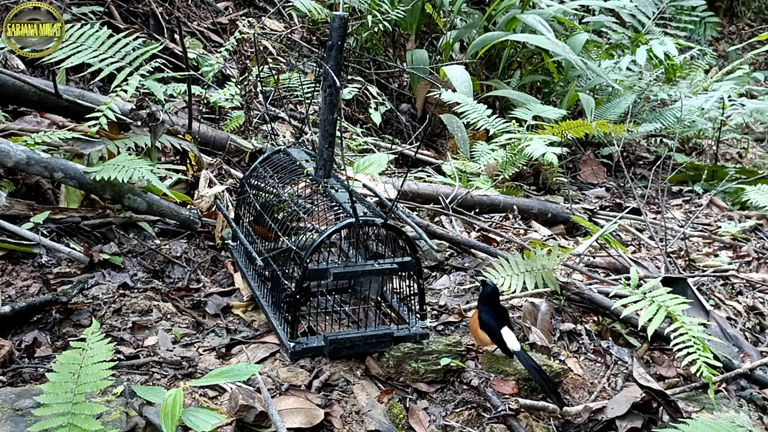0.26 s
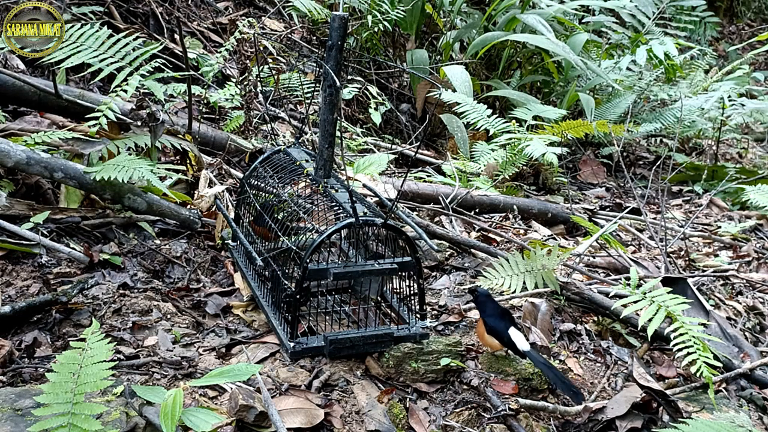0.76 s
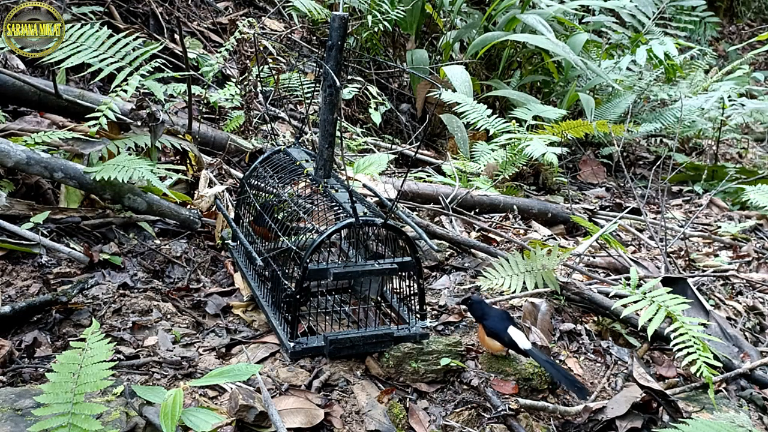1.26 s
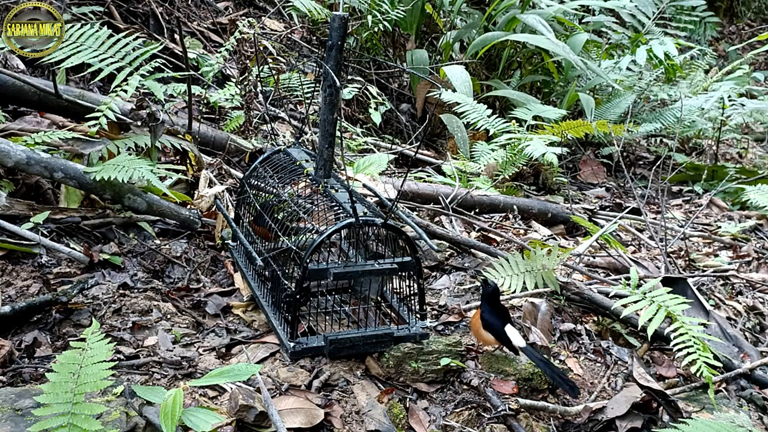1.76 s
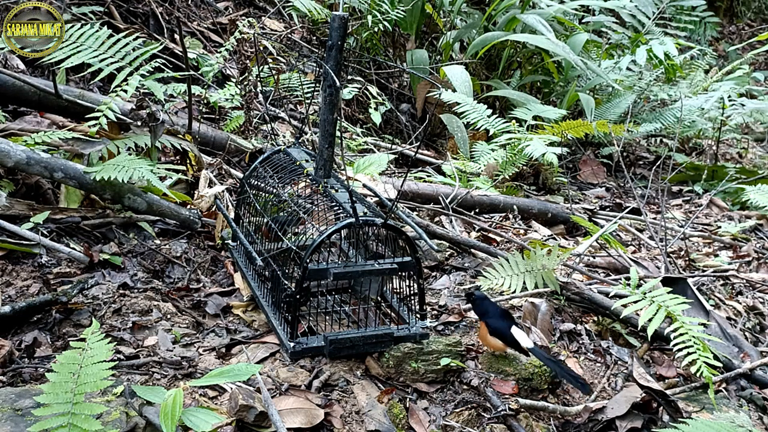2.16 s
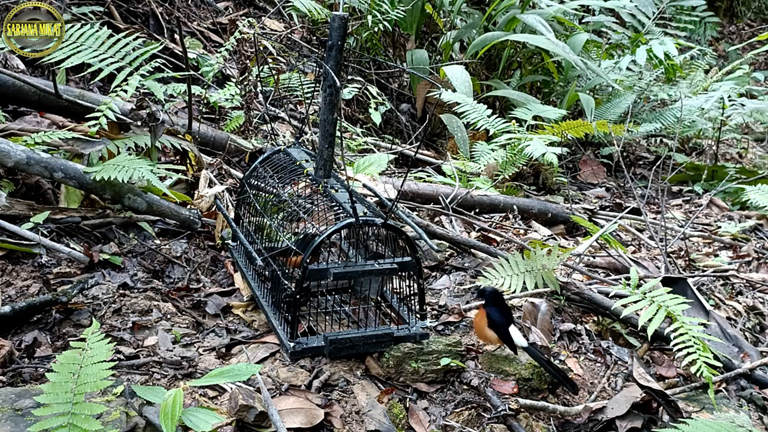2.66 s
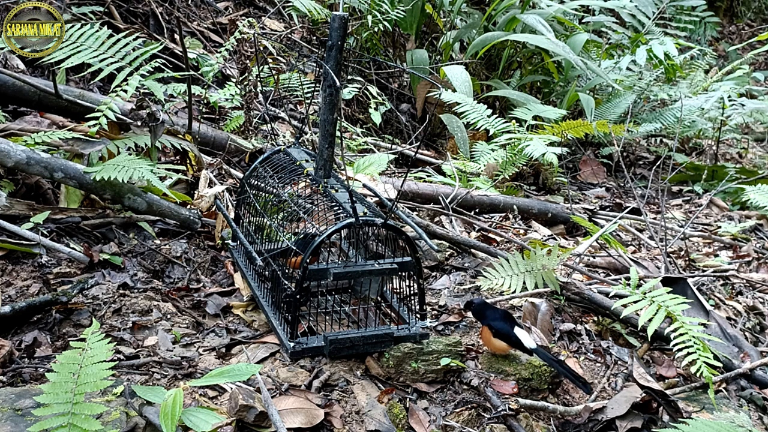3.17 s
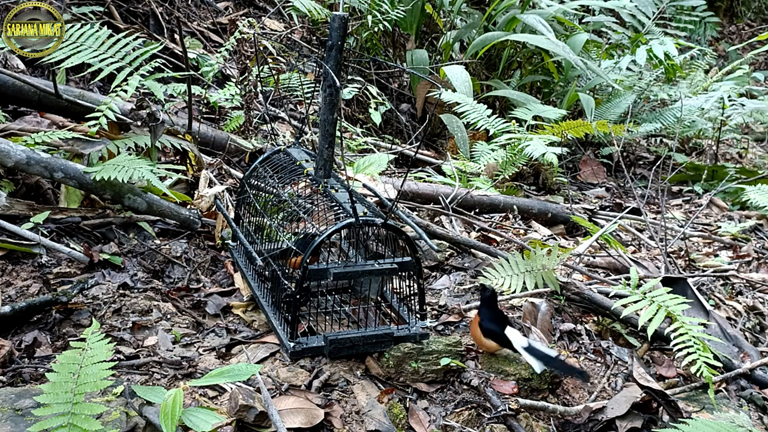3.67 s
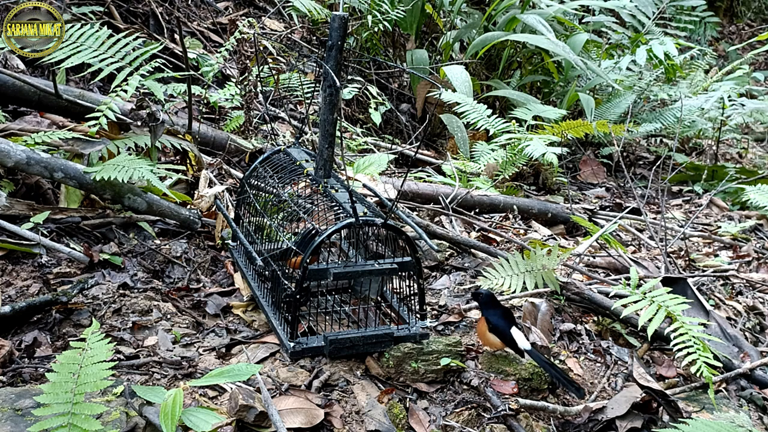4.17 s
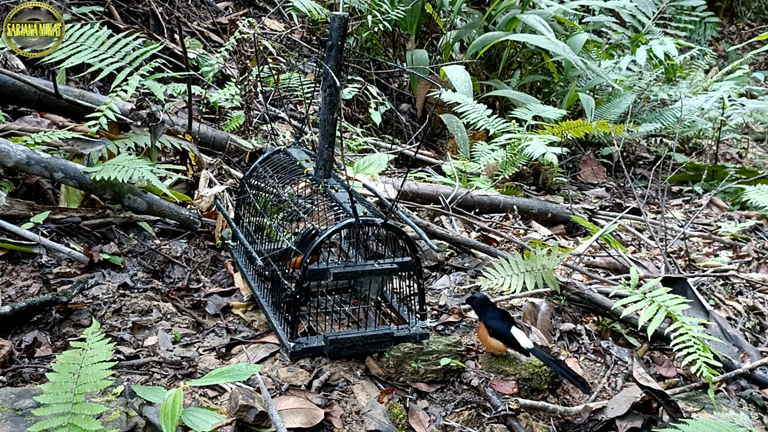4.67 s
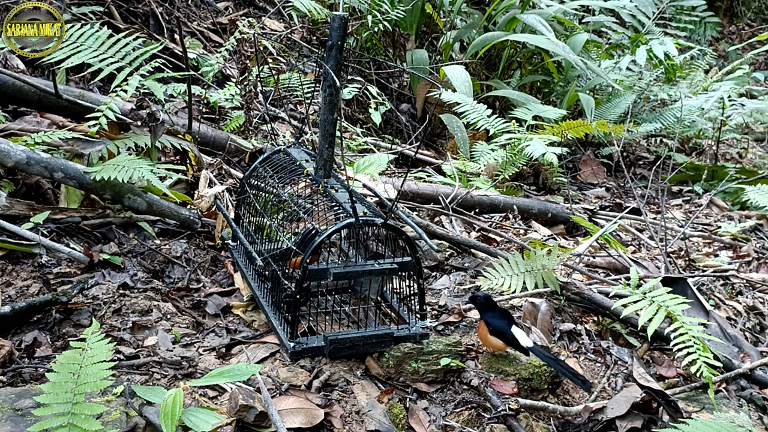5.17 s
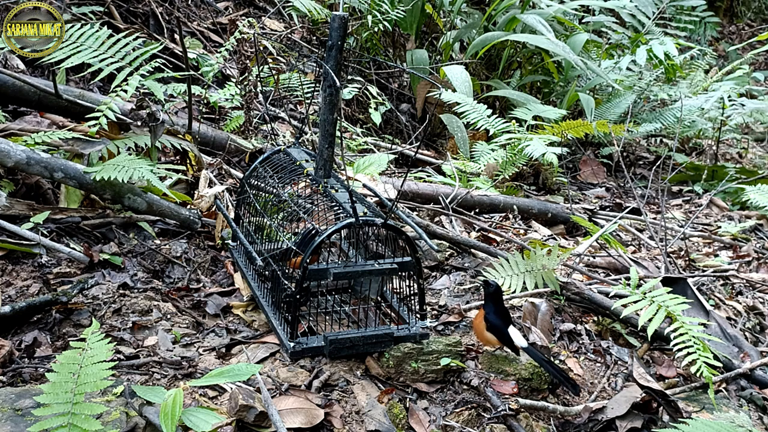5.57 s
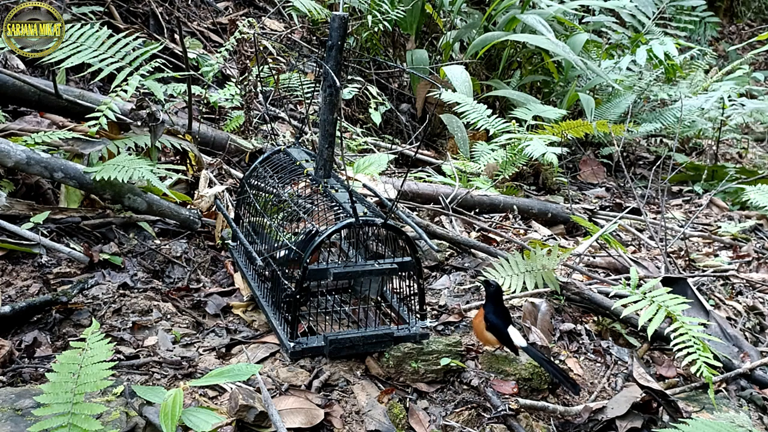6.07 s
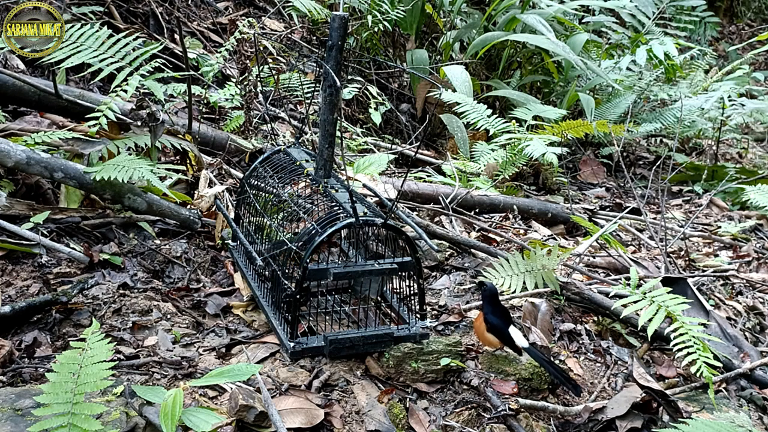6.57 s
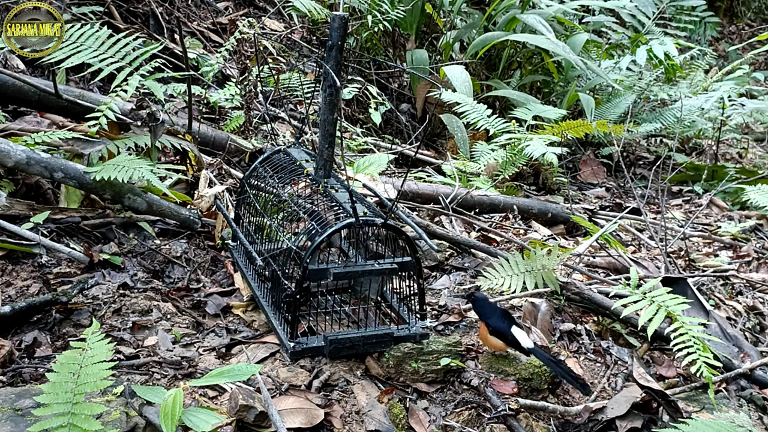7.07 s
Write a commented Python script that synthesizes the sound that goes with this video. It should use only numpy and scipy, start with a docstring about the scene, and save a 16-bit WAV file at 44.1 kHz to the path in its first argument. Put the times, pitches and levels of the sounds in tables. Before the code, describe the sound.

In a damp forest, a bird performs a varied song in broken phrases: quiet gliding whistles, two strong raspy rattle passages, quick upward chirps, swooping and warbled whistles, and tiny ticks between. The loudest strokes are close and slightly overloaded, with a faint pre-copy and a brief diffuse echo from trunks. A soft, high, gently throbbing cicada band and airy hush fill the stereo background.

```python
"""Forest floor: a songbird sings whistles, warbles, buzzy chirps and hard rattles over a cicada chorus.
Its whistles are gliding near sines; its rattles and ticks are very fast sweeps, with rasp and throat hiss.
Each bird sound arrives twice, a faint early copy and then the strong one, with echoes from the trunks.
Behind it, drifting noise makes the forest hush and throbbing noise bands make the cicadas.
The loudest peaks clip at full scale."""
import sys
import numpy as np
from scipy import signal
from scipy.fft import rfft, irfft, next_fast_len
from scipy.io import wavfile
from scipy.ndimage import uniform_filter1d

SR = 44100
rng = np.random.default_rng(int(sys.argv[2]) if len(sys.argv) > 2 else 0)


def bounce(signal):
    """Save signal as a 16-bit WAV file at the path given by the first command-line argument."""
    frames = np.transpose(np.atleast_2d(signal))
    limited = np.clip(frames, -1, 1)
    pcm = np.round(limited * 32767).astype(np.int16)
    wavfile.write(sys.argv[1], SR, pcm)


N = 322371
EDGE_HZ = 15600  # upper edge of the sound's band
FLICK_HALF = 400  # samples from the start of a flick to its peak


# Hiss of air through the throat, relative spectrum: pitch_hz, level_db
AIRFLOW_SPECTRUM = [(1500, -30), (2500, 0), (4000, -14), (9000, -6), (15000, -16)]


def bird():
    """The whole dry song, with breath noise that follows the whistled notes, low ones most."""
    song = whistled_song()
    low_weighted = uniform_filter1d(song, size=11)
    effort = np.sqrt(abs(uniform_filter1d(low_weighted ** 2, size=200)))
    hiss = amp(-32) * effort * coloured(AIRFLOW_SPECTRUM)
    return song + rattles() + rasp() + ticks() + hiss


# Freely shaped whistles, each a curve of points: time_s, pitch_hz, level_db
FREE_WHISTLES = [
    [(0.125, 1607, -44.5), (0.215, 1717, -35.5), (0.24, 1481, -23.5), (0.257, 1038, -28)],
    [(0.53, 616, -57), (0.575, 859, -43), (0.6, 1268, -39.5), (0.62, 1342, -41.5), (0.635, 1197, -73)],
    [(1.45, 1518, -48.5), (1.475, 1248, -41.5), (1.51, 1619, -34.5), (1.53, 1482, -26.5),
     (1.548, 1125, -45)],
    [(2.958, 2178, -33.5), (2.971, 2660, -15.5), (2.976, 3400, -38)],
    [(2.983, 2770, -23), (2.987, 2876, -10.5), (2.993, 3536, -29.5), (2.999, 4500, -22)],
    [(3.005, 4260, -29), (3.012, 4520, -35.5), (3.02, 4820, -26)],
    [(3.034, 5090, -35), (3.042, 5450, -39), (3.05, 5550, -17)],
    [(3.598, 1622, -22.5), (3.628, 1723, -34), (3.64, 2194, -40), (3.655, 2390, -27.5)],
    [(4.44, 989, -49), (4.449, 2080, -19), (4.458, 1757, -15)],
    [(4.466, 1536, -29.5), (4.481, 1340, -30)],
    [(4.5, 2314, -56.5), (4.575, 2470, -46.5), (4.605, 2310, -54.5), (4.615, 2427, -33.5),
     (4.632, 2944, -33.5)],
    [(4.6, 1475, -34), (4.62, 1218, -42.5), (4.645, 1897, -14), (4.665, 2120, -17.5)],
    [(4.704, 1734, -22), (4.711, 2458, 1.5), (4.716, 2890, -4.5), (4.724, 2453, -2.5), (4.76, 2195, -3.5),
     (4.793, 2084, -25)],
    [(4.983, 1872, -23.5), (4.988, 2732, -7), (4.992, 3030, -14.5), (5.0, 2710, -6.5), (5.01, 2495, -19.5),
     (5.016, 2150, -36)],
    [(5.68, 4086, -43), (5.69, 3330, -30), (5.693, 2627, -23), (5.696, 2440, -8.5), (5.701, 2340, -25)],
    [(5.712, 4355, -28.5), (5.72, 2692, -9.5), (5.727, 2094, -15.5), (5.736, 2690, -12),
     (5.745, 2890, -17.5)],
    [(7.14, 730, -34), (7.165, 1273, -24), (7.19, 1562, -29), (7.2, 1290, -26.5), (7.212, 1548, -21.5),
     (7.232, 1200, -36)],
]


def whistled_song():
    """Everything sung as a near sine: free whistles, ruled shapes and buzzy chirps."""
    song = np.zeros(N)
    curves = FREE_WHISTLES + simple_notes() + plunges() + held_notes() + warbles() + rattle_closers()
    for rows in curves:
        add(song, *whistle(rows))
    for rows in buzzy_chirps():
        add(song, *whistle(rows, buzzy=True))
    return song


# Simple notes, loudest where the pitch turns:
# start_s, turn_s, end_s, start_hz, turn_hz, end_hz, turn_level_db
SIMPLE_NOTES = [(0.012, 0.062, 0.115, 580, 514, 414, -55.5), (0.014, 0.074, 0.105, 1010, 1150, 757, -39),
                (0.256, 0.283, 0.33, 785, 751, 680, -39), (0.27, 0.307, 0.33, 1143, 1062, 1054, -33),
                (0.421, 0.449, 0.47, 1056, 1147, 870, -41.5), (0.396, 0.445, 0.465, 564, 544, 516, -55.5),
                (1.114, 1.128, 1.18, 2703, 2676, 2284, -20), (1.419, 1.455, 1.53, 919, 790, 753, -53.5),
                (1.614, 1.633, 1.675, 1170, 1328, 1279, -20.5),
                (2.363, 2.378, 2.395, 2576, 2528, 2280, -23), (3.017, 3.038, 3.052, 2176, 3023, 3480, -28),
                (3.308, 3.329, 3.365, 1017, 1075, 1431, -51.5),
                (3.355, 3.401, 3.425, 660, 1205, 1476, -21.5),
                (3.489, 3.498, 3.535, 1523, 1460, 1757, -17.5), (4.475, 4.489, 4.59, 1784, 1647, 1570, -33),
                (5.07, 5.244, 5.32, 1678, 1688, 1660, -50), (5.826, 5.997, 6.09, 1630, 1870, 1934, -55),
                (7.241, 7.248, 7.268, 1526, 1482, 1154, -27.5), (7.267, 7.296, 7.32, 668, 1147, 1554, -20)]
ONSET_DB, ENDING_DB = -15, -8.5  # start and end of a note, relative to its turn


def simple_notes():
    """Each note swells to its turn, then fades."""
    return [[(start, start_hz, db + ONSET_DB), (turn, turn_hz, db), (end, end_hz, db + ENDING_DB)]
            for start, turn, end, start_hz, turn_hz, end_hz, db in SIMPLE_NOTES]


# Plunging whistles: time_s of the loudest point, top_hz, level_db at that point
PLUNGE_TABLE = [(3.443, 1500, -15), (3.545, 1760, -12), (3.672, 2378, -17.5)]
LOUDEST_HZ, BOTTOM_HZ, FALL_HZ_PER_S = 1217, 580, 62000
TOP_DB, BOTTOM_DB = -22.5, -20  # both relative to the loudest point


def plunges():
    """A steady steep fall from the top to the bottom of the voice, loudest on the way."""
    curves = []
    for s, top_hz, db in PLUNGE_TABLE:
        points = [(top_hz, TOP_DB), (LOUDEST_HZ, 0), (BOTTOM_HZ, BOTTOM_DB)]
        curves.append([(s + (LOUDEST_HZ - hz) / FALL_HZ_PER_S, hz, db + under_db)
                       for hz, under_db in points])
    return curves


# Long thin notes: start_s, loudest_s, end_s, held_hz, top_hz, accent_level_db, end_level_db
HELD_TABLE = [(5.158, 5.327, 5.355, 3296, 4100, -27, -16), (5.815, 6.104, 6.145, 3842, 4420, -37.5, -10)]
HELD_DB, SWELL_DB = -37, -9.5  # thin part, loudest point
ACCENT_S, SWELL_S = 0.025, 0.044  # fade of the accent, rise of the swell


def held_notes():
    """Accent, thin steady tone, swell, upward flick."""
    curves = []
    for start, loudest, end, hz, top_hz, accent_db, end_db in HELD_TABLE:
        bend_hz = hz + 0.368 * (top_hz - hz)
        curves.append([(start, hz, accent_db), (start + ACCENT_S, hz, HELD_DB),
                       (loudest - SWELL_S, hz, HELD_DB), (loudest, hz, SWELL_DB),
                       ((loudest + end) / 2, bend_hz, SWELL_DB - 7.5), (end, top_hz, end_db)])
    return curves


# Warbled whistles: start_rate_per_s, end_rate_per_s, curve of (time_s, pitch_hz, level_db)
WARBLE_TABLE = [(70.2, 56, [(3.76, 2100, -55), (3.84, 2345, -26.5), (3.92, 2156, -21.5), (3.97, 1967, -19),
                (4.065, 1544, -33)]), (53.9, 22, [(6.895, 678, -58.5), (6.94, 775, -38.5),
                (6.98, 1363, -29), (7.06, 1563, -35.5), (7.11, 1545, -31.5), (7.14, 1115, -42)])]
WARBLE_SHARE, WARBLE_GROWS_S = 0.044, 0.03  # depth as a share of pitch; full at points after this time


def warbles():
    """Adds a rate and a depth in Hz to each point, for a warble that grows in and slows down."""
    curves = []
    for first_per_s, last_per_s, rows in WARBLE_TABLE:
        start, end = rows[0][0], rows[-1][0]
        curve = []
        for s, hz, db in rows:
            rate = np.interp(s, [start, end], [first_per_s, last_per_s])
            depth_hz = WARBLE_SHARE * hz * min((s - start) / WARBLE_GROWS_S, 1) ** 2
            curve.append((s, hz, db, rate, depth_hz))
        curves.append(curve)
    return curves


# Falling whistles that close a long rattle: start_s, last_pitch_hz, last_level_db
CLOSER_TABLE = [(1.164, 852.6, -21.5), (2.366, 782, -30.5)]
# Their common shape before the last point: after_start_s, pitch_hz, level_db
CLOSER_SHAPE = [(0, 1401, -25), (0.028, 1115, -12), (0.054, 1000, -19.5), (.064, 974, -28)]
CLOSER_S = .1  # start to last point


def rattle_closers():
    """One falling shape, with its own last pitch and level each time."""
    return [np.add(CLOSER_SHAPE + [(CLOSER_S, hz, db)], (s, 0, 0)) for s, hz, db in CLOSER_TABLE]


# Rising buzzy chirps: time_s, level_db added to the shape
CHIRPS = [(6.342, -27.5), (6.413, -22.5), (6.487, -23)]
# Their common shape: from_chirp_time_s, pitch_hz, level_db
CHIRP_SHAPE = [(-.011, 1922, -11), (-.005, 2460, -3), (0, 3050, -15), (.004, 3880, -6), (.007, 4450, 9.5)]


def buzzy_chirps():
    """The same upward chirp, placed and levelled for each call."""
    return [np.add(CHIRP_SHAPE, (s, 0, db)) for s, db in CHIRPS]


# Overtones by sung pitch, strongest with the beak wide open on high notes: pitch_hz, level_db
BEAK_OVERTONES = [(900, -56), (1250, -44), (1550, -54), (2000, -48), (3300, -44), (4000, -23)]
# Overtones of the buzzy chirps by their own pitch: overtone_hz, level_db
CHIRP_OVERTONES = [(3900, -12), (5000, 5), (6200, 0), (7200, -22), (8400, -18), (9300, 9), (10500, -12),
                   (13000, -24)]
FORCED_DB, FORCED_SLOPE = -11, .7  # below this level the harmonics tilt, dB apart per dB
SHIVER_HZ, RAGGED_S = 5, .0007  # tremor of a steady note; glides add their slope (Hz per s) times this


def whistle(rows, buzzy=False):
    """A near sine with rounded glides and a slight tremor; optional columns make it warble."""
    s, *columns = np.transpose(rows)
    t = np.arange(s[0] - .004, s[-1] + 0.0031, 1 / SR)
    hz, db, *warble = (uniform_filter1d(np.interp(t, s, c), size=90, mode="nearest") for c in columns)
    if warble:
        rate, depth_hz = warble
        swing = 2 * np.pi * np.cumsum(rate) / SR
        hz = hz + depth_hz * np.sin(swing)
        db = db + .012 * depth_hz * np.cos(swing)
    shiver, flutter = (evened(uniform_filter1d(uniform_filter1d(n, size=120), size=120))
                       for n in rng.standard_normal((len(t), 2)).T)
    glide_hz_per_s = abs(np.gradient(hz)) * SR
    shaky_hz = hz + (SHIVER_HZ + RAGGED_S * glide_hz_per_s) * shiver
    phase = 2 * np.pi * (np.cumsum(shaky_hz) / SR + rng.random())
    upper = 0
    for k in (2, 3):
        overtone_db = read(CHIRP_OVERTONES, k * hz) if buzzy else read(BEAK_OVERTONES, hz)
        # on soft notes the third harmonic fades and the second gains
        tilt_db = (k - 2.5) * FORCED_SLOPE * np.minimum(db - FORCED_DB, 0)
        upper = upper + amp(overtone_db + tilt_db) * np.sin(k * phase) * (k * hz < EDGE_HZ)
    edges = np.clip(np.minimum(t - t[0], t[-1] - t) / .008, 0, 1)
    fade = np.sin(edges * np.pi / 2) ** 2
    return t[0], np.sqrt(2) * amp(db + 0.96 * flutter) * (np.sin(phase) + upper) * fade


# Rattle beats: time_s, level_db before the boost of each stroke, centre_hz
RATTLE_BEATS = [(0.656, -12.5, 2800), (0.6886, -3.5, 2576), (0.72, -8.5, 2392), (0.879, -8.5, 2423),
                (0.909, -2, 2473), (0.94, -3, 2557), (0.9738, -1, 2475), (1.006, -2, 2567),
                (1.0437, -3, 2607), (1.0801, -3, 2615), (1.114, -4.5, 2360), (1.1492, -7, 2000),
                (1.824, -12, 2840), (1.856, -7, 2524), (1.8894, -8.5, 2484), (2.0391, -13.5, 2675),
                (2.0691, -1.5, 2725), (2.102, -2, 2484), (2.133, -1.5, 2623), (2.1683, -1.5, 2497),
                (2.208, -3.5, 2387), (2.243, -2.5, 2577), (2.28, -2.5, 2363), (2.3167, -4, 2183),
                (2.3545, -11.5, 1967)]
PAUSE_S = .08  # a longer gap starts a new burst
SWEEP_HZ_PER_MS, FLATTENS_S = -240, .11  # sweep of the first beat, time constant of its flattening
SWEEP_SPREAD_HZ_PER_MS, SHORTEST = 60, .45  # chance in later sweeps; their share of the first length
DOUBLE_S = 0.0025  # gap between the two strokes of a late beat
LOWER_VOICE_DB, LOWER_HEAD_DB = -21, -0.5  # lower voice, and its change at the head of a burst


def rattles():
    """Beats fall steeply at first, then flatten, shorten and split in two, over a lower voice."""
    beats = np.zeros(N)
    first = last = 0
    for s, db, hz in RATTLE_BEATS:
        if s - last > PAUSE_S:
            first = s
        last = s
        fresh = np.exp(-(s - first) / FLATTENS_S)  # 1 at the head of a burst
        worn = 1 - fresh
        begin = s - FLICK_HALF / SR
        sweep = SWEEP_HZ_PER_MS * fresh
        uneven_sweep = sweep + SWEEP_SPREAD_HZ_PER_MS * worn * rng.standard_normal()
        ms = rng.uniform(.8, 1.3) * (SHORTEST + (1 - SHORTEST) * fresh)
        add(beats, begin - worn * DOUBLE_S / 2, flick(db + 3.5, hz, uneven_sweep, ms))
        second_sweep = SWEEP_SPREAD_HZ_PER_MS * rng.standard_normal()
        add(beats, begin + DOUBLE_S / 2, worn * flick(db + 2, hz, second_sweep, 2 * SHORTEST))
        lead = -sweep * 3.3e-5  # the steeper the fall, the earlier the lower voice
        lower = flick(LOWER_VOICE_DB + LOWER_HEAD_DB * fresh, 1750, -130, 1 + 1.2 * fresh)
        add(beats, begin - lead, lower)
    return beats


# Throat rasp, relative spectrum: pitch_hz, level_db
RASP_SPECTRUM = [(700, -47.5), (1400, -26.5), (2100, -8), (2500, -2), (2950, -8), (3700, -21), (5500, -28),
                 (7500, -22), (13400, -39)]


def rasp():
    """The throat rasps on unevenly after each rattle beat: coloured noise in short fading strokes."""
    strokes = np.zeros(N)
    stroke = amp(-60 * np.arange(1400) / SR / .2) * np.hanning(2800)[1400:] ** .3
    for s, _, _ in RATTLE_BEATS:
        add(strokes, s, stroke)
    unevenness = amp(5 * drift(400))
    return amp(-19) * uniform_filter1d(strokes, size=130) * coloured(RASP_SPECTRUM) * unevenness


# Short ticks: time_s, level_db, centre_hz, sweep_hz_per_ms, length_ms
TICK_TABLE = [(4.381, -40.5, 2750, -250, 0.45), (4.419, -41, 2170, -200, 1.5), (4.95, -21, 5110, -68, 2.2),
              (4.959, -25, 3850, -150, 2.9), (4.962, -31, 2464, -86, 1.5)]


def ticks():
    """Single flicks of the voice between the phrases."""
    out = np.zeros(N)
    for s, *tick in TICK_TABLE:
        add(out, s - FLICK_HALF / SR, flick(*tick))
    return out


def flick(db, hz, sweep, ms):
    """One very fast sweep, loudest as it crosses the throat resonance."""
    from_peak_ms = np.arange(-FLICK_HALF, FLICK_HALF) / SR * 1000
    pitch = np.clip(hz + sweep * from_peak_ms, 600, 6000)
    shape = np.hanning(len(from_peak_ms)) / np.cosh(from_peak_ms / ms)
    return np.sqrt(2) * amp(db) * np.sin(2 * np.pi * (np.cumsum(pitch) / SR + rng.random())) * shape


# Tilt of the bird between the sides: pitch_hz, left_over_right_db
SIDE_TILT = [(1000, -0.5), (2500, 2.3), (8000, 0.5)]
# Decay of the forest tail by 60 dB: pitch_hz, decay_s
TRUNK_DECAY = [(700, 0.28), (1300, 0.3), (2500, 0.29), (3500, 0.36), (6000, 0.4)]
EARLY_S, LAG_S = 768 / SR, 4 / SR  # lead of the early copy, lag of the left microphone


def forest(x, early_db=-13.5, near_db=-11.5, tail_db=-12, shared=.4):
    """Early copy, strong arrival, close leaf and log echoes, and a long tail from the trunks."""
    size = next_fast_len(N + SR)
    hz = np.fft.rfftfreq(size, 1 / SR)
    # sparse echoes of random sign, one in every 20 samples
    taps = np.zeros((2, SR // 2 * 2))
    at = np.arange(80, SR - 20, 20) + rng.integers(0, 20, (2, (SR - 81) // 20))
    np.put_along_axis(taps, at, rng.choice([-1., 1.], at.shape), 1)
    # the two sides hear partly the same echoes
    taps[1] = shared * taps[0] + np.sqrt(1 - min(shared, 1) ** 2) * taps[1]
    near = taps * amp(-60 * np.arange(taps.shape[1]) / SR / 0.12)
    f, t, z = signal.stft(taps, SR, nperseg=256)
    tail_decay = amp(-60 * t / read(TRUNK_DECAY, f)[:, None])
    tail = signal.istft(z * tail_decay, SR, nperseg=256)[1]
    echoes = sum(amp(db) * rfft(taps_in / np.linalg.norm(taps_in[0]), size)
                 for db, taps_in in ((near_db, near), (tail_db, tail)))
    bias = read(SIDE_TILT, hz) / 2
    sides = np.array([amp(bias), amp(-bias) * np.exp(2j * np.pi * hz * LAG_S)])
    twice = 1 + amp(early_db) * np.exp(2j * np.pi * hz * EARLY_S)
    return irfft(rfft(x, size) * twice * sides * (1 + echoes), size)[:, :N]


# Cicada choirs: centre_hz, width_hz at half amplitude, level_db before the final gain
CICADA_CHOIRS = [(5530, 300, -56.5), (6090, 540, -51), (7560, 1200, -53.5), (12250, 990, -59)]


def cicadas():
    """Many tymbals blur into narrow noisy bands that throb faintly and swell."""
    out, hz = np.zeros((2, N)), np.fft.rfftfreq(N, 1 / SR)
    for centre_hz, width_hz, db in CICADA_CHOIRS:
        bell = 1 / (1 + ((hz - centre_hz) / (width_hz / 2)) ** 2)
        band = irfft(rfft(rng.standard_normal((2, N))) * bell, N)
        throb_hz = 29 * (1 + 0.15 * drift(1.3))
        throb = np.sin(2 * np.pi * np.cumsum(throb_hz) / SR)
        out += evened(band) * amp(db + 2.2 * throb + 1.2 * drift(1.5))
    return out * 1.1


# Forest hush, relative spectrum: pitch_hz, level_db per Hz
HUSH_SPECTRUM = [(30, -39), (60, -31), (250, -31.5), (1000, -34), (1700, -35), (3400, -35), (6000, -11),
                 (7700, -16), (8800, -24), (12200, -25.5), (15600, -23.5)]
HUSH_DB = -50  # overall rms


def hush():
    """Distant leaves and insects: noise with drifting patches, unrelated left and right."""
    frames, hz = N // 256 + 5, np.fft.rfftfreq(1024, 1 / SR)
    real, imaginary, patches = rng.standard_normal((frames, 513, 2, 3)).T
    patches = uniform_filter1d(patches, size=10, axis=1)  # across pitch
    patches = evened(uniform_filter1d(patches, size=12, axis=2))  # across time
    z = (real + 1j * imaginary) * amp(read(HUSH_SPECTRUM, hz)[:, None] + 3.0 * patches)
    return amp(HUSH_DB) * evened(signal.istft(z, nperseg=1024, noverlap=768)[1][:, :N])


def coloured(points):
    """Steady noise of rms 1 with the given spectrum."""
    colour = amp(read(points, np.fft.rfftfreq(N, 1 / SR)))
    return evened(irfft(rfft(rng.standard_normal(N)) * colour, N))


def drift(per_s):
    """Slow random curve of rms 1, with this many new random values per second."""
    knots = np.arange(0, N / SR + 1, 1 / per_s)
    curve = np.interp(np.arange(N) / SR, knots, rng.standard_normal(len(knots)))
    return evened(uniform_filter1d(curve, int(SR / per_s)))


def amp(db):
    """Gain of a level in dB."""
    return 10 ** (np.asarray(db) / 20)


def evened(x):
    """Scales to rms 1."""
    return x / np.sqrt(np.mean(x ** 2) + 1e-20)


def read(points, hz):
    """Reads a spectrum on a log-frequency axis."""
    f, value = np.transpose(points)
    return np.interp(np.log(hz + 1), np.log(f + 1), value)


def add(mix, s, sound):
    """Mixes a sound in at time s."""
    part = mix[round(s * SR):][:len(sound)]
    part += sound[:len(part)]


def scene():
    """Bird in the forest, over the cicadas and the hush."""
    return forest(bird()) + cicadas() + hush()


def record(dry):
    """The converter clips at full scale; then a low-pass limits the band."""
    clipped = np.clip(dry, -1, 1)
    low_pass = signal.firwin(511, EDGE_HZ, window=("kaiser", 9), fs=SR)
    return signal.oaconvolve(clipped, low_pass[None], "same")


dry = scene()
out = record(dry)
bounce(out)
```